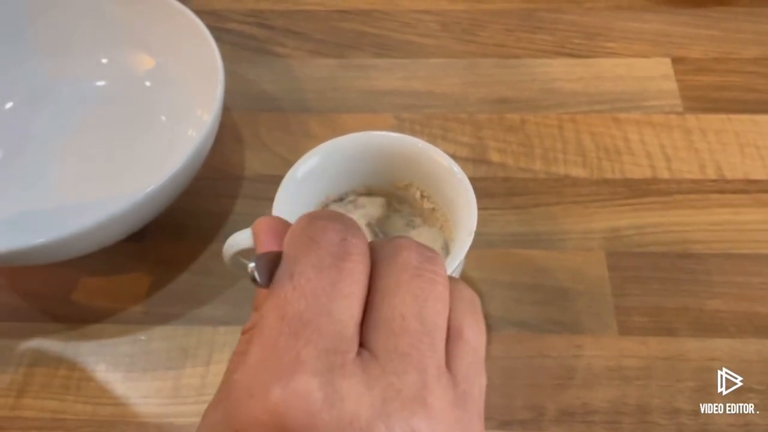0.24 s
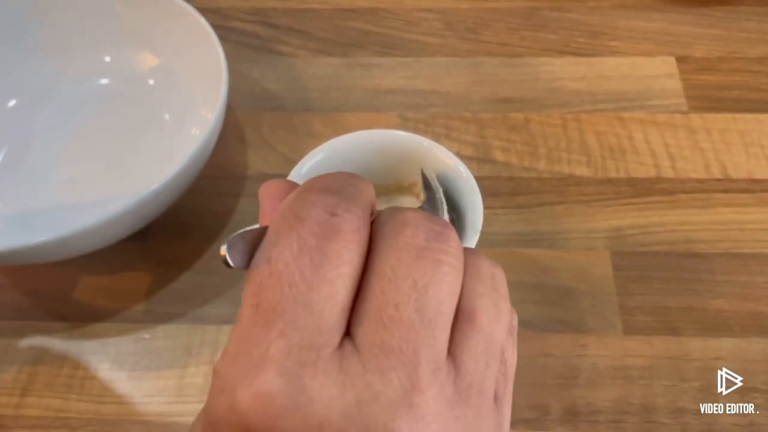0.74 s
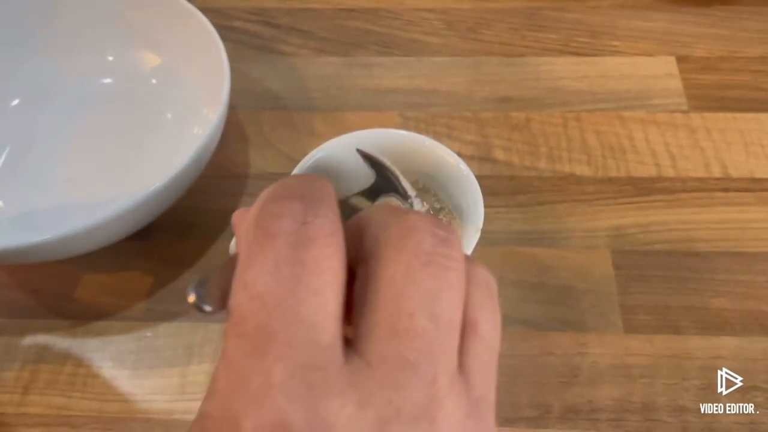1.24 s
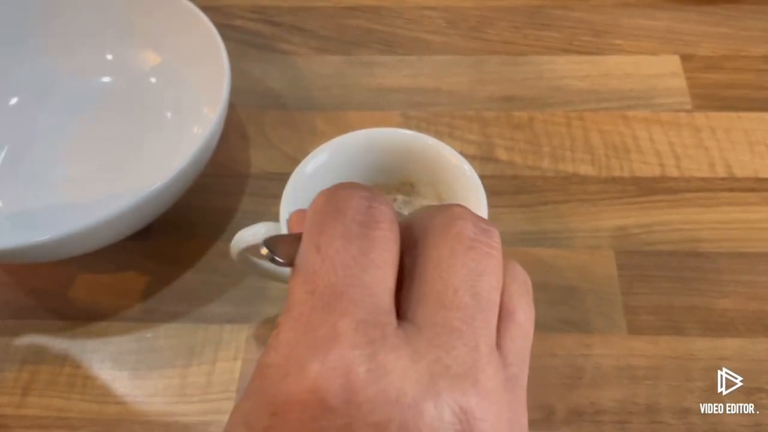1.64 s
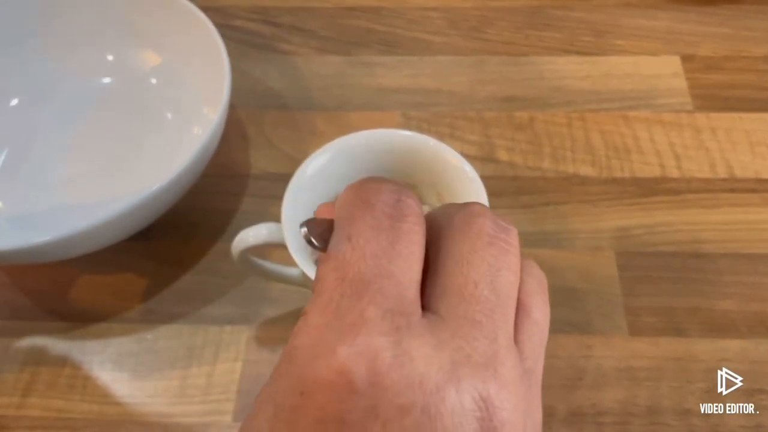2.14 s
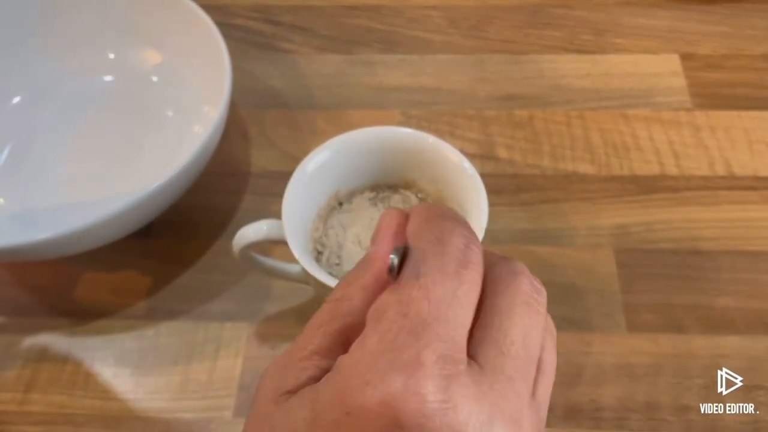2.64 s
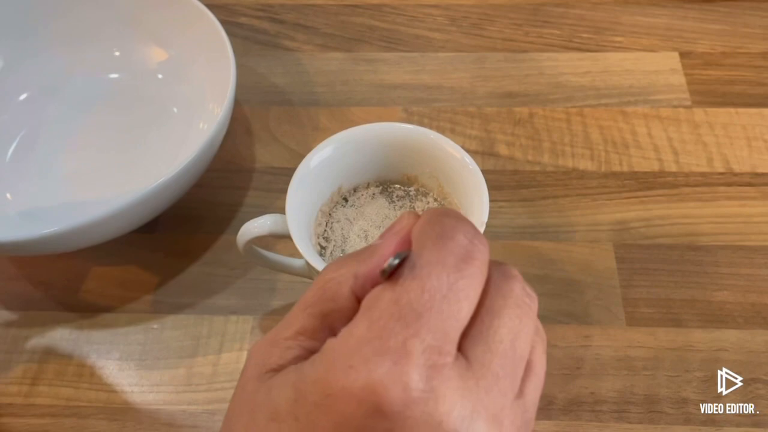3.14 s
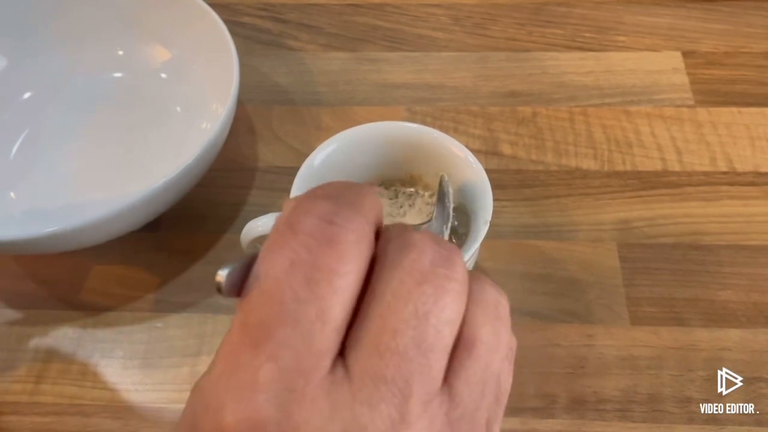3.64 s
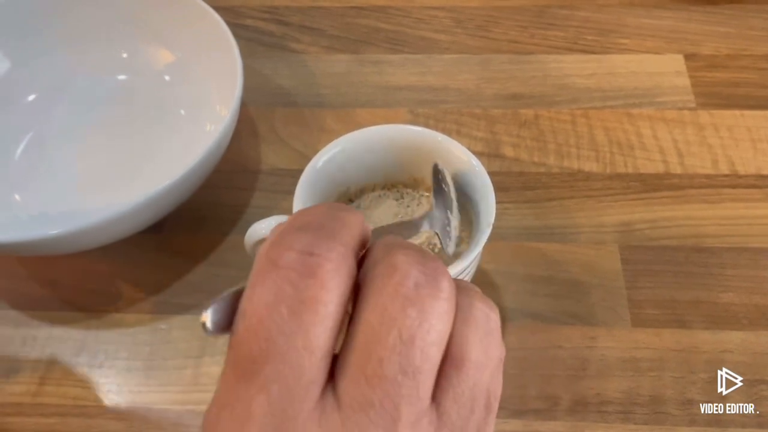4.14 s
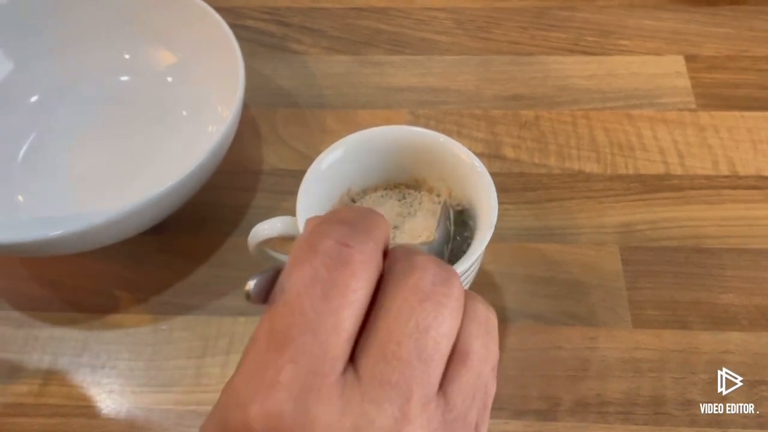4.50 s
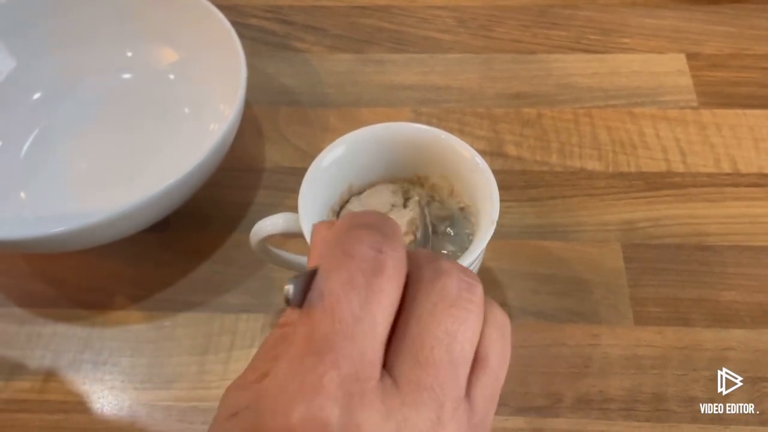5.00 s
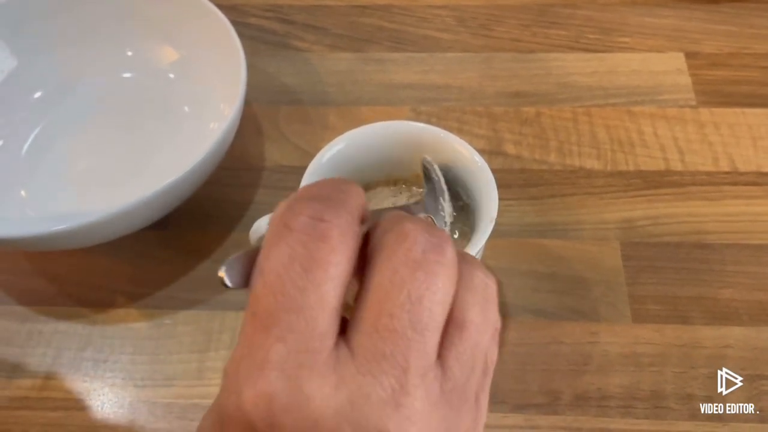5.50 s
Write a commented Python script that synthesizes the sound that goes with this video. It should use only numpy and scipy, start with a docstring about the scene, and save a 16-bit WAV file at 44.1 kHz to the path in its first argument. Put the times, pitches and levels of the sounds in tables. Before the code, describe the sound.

Close above a wooden worktop, a metal spoon taps and rubs the wall of a small filled mug. Hum alone comes first, then irregular clinks with short, damped ceramic ringing, low wooden thuds and small dull bubbles. One heavy rattling blow stands out near two seconds; a busy cluster follows until just after three, then scattered quieter touches. Small live kitchen, faint hiss, stereo phone pickup.

```python
"""An appliance hums in a small kitchen; then a steel teaspoon stirs a thick drink in a small ceramic mug.
The spoon rubs (tiny slips) and clinks (noise bursts and ringing tones) against the wall of the mug.
Blows jolt the mug on the wooden worktop (low dying tones) and the drink sloshes (many small bubbles).
A phone with two microphone ports listens from just above, with quick echoes and the room around it."""
import sys
import numpy as np
from scipy import signal
from scipy.fft import rfft, irfft
from scipy.io import wavfile

SR = 44100
rng = np.random.default_rng(int(sys.argv[2]) if len(sys.argv) > 2 else 0)


def unload_audio(sound):
    """Save the sound as a 16-bit wav file, at the path given as the first command line argument."""
    columns = np.transpose(np.atleast_2d(sound))
    # keep every value between -1 and 1, then stretch to whole-number steps
    steps = np.round(np.clip(columns, -1, 1) * 32767)
    wavfile.write(sys.argv[1], SR, steps.astype(np.int16))


N = 254016
TIME = np.arange(N) / SR
# seconds since the start of one short sound, up to half a second
AGE = TIME[:SR // 2]


def from_db(db):
    """Turn decibels into a plain factor."""
    return 10 ** (np.asarray(db) / 20)


def rms_one(x):
    """Scale a sound to an average strength (rms) of 1."""
    return x / np.sqrt(np.mean(x ** 2) + 1e-20)


def onset_one(x):
    """Scale a blow to rms 1 over its first 12 ms."""
    onset = x[:round(.012 * SR)]
    return x / np.sqrt(np.mean(onset ** 2) + 1e-20)


def at_hz(points, hz, axis=1):
    """Read one column of a table between its rows, on a log-frequency axis."""
    rows = np.array(points)
    return np.interp(np.log(np.maximum(hz, 1)), np.log(rows[:, 0]), rows[:, axis])


def dying(t60):
    """Fade by 60 dB in t60 seconds."""
    return from_db(-60 * AGE / t60)


def mode(hz, t60):
    """A struck resonance: a dying tone that starts upwards or downwards at random."""
    tone = np.sin(2 * np.pi * hz * AGE) * dying(t60)
    return rng.choice([-1, 1]) * onset_one(tone)


def resonate(x, hz, width_hz):
    """Ring a resonance with x, at rms 1; its centre may move from sample to sample."""
    turn = np.exp(2j * np.pi * np.cumsum(hz * np.ones(len(x))) / SR)
    memory = np.exp(-np.pi * width_hz / SR)
    # shift the centre down to 0 Hz, smooth there, and shift back up
    smoothed = signal.lfilter([1], [1, -memory], x / turn)
    return rms_one(np.real(turn * smoothed))


def band(x, low_hz, high_hz, order=2):
    """Keep only the pitches between two limits."""
    sos = signal.butter(order, [low_hz, min(high_hz, SR / 2 - 1)], "band", fs=SR, output="sos")
    return signal.sosfilt(sos, x)


def coloured(x, spectrum):
    """Give white noise of rms 1 a spectrum in dB per Hz."""
    hz = np.fft.rfftfreq(x.shape[-1], 1 / SR)
    gain = from_db(at_hz(spectrum, hz)) * np.sqrt(SR / 2)
    return irfft(rfft(x) * gain, x.shape[-1])


def add(out, s, x):
    """Mix x into out from time s on."""
    i = max(round(s * SR), 0)
    out[i:i + len(x)] += x[:max(N - i, 0)]


HUM_HZ, HUM_DB = 99.85, -48.5
# the appliance's rumble in the room: (frequency [Hz], level [dB per Hz])
ROOM_RUMBLE = [(20, -116), (32, -90), (50, -71.5), (75, -79), (95, -67.5), (116, -73), (135, -79.5),
               (150, -77.5), (240, -83.5), (275, -75.5), (300, -79.5), (322, -77.5), (365, -87),
               (700, -103), (1000, -110)]
# quiet air and microphone hiss: (frequency [Hz], level [dB per Hz])
QUIET_HISS = [(300, -117), (1700, -119), (2500, -123), (6000, -130), (10000, -133), (12500, -134),
              (14000, -143), (16000, -150)]
# a faint high whine: (frequency [Hz], width [Hz], level [dB])
HIGH_WHINE = [(8100, 80, -98), (8720, 150, -86.5), (9140, 160, -88.5)]


def background(rumble_side_db=-17, hiss_side_db=-1.0):
    """A steady tone hums over low noise, with faint hiss and a thin whine made of narrow noise bands."""
    hum = from_db(HUM_DB) * np.sqrt(2) * np.sin(2 * np.pi * HUM_HZ * TIME)
    below_1000_hz = signal.butter(4, 1000, fs=SR, output="sos")
    rumble = signal.sosfilt(below_1000_hz, coloured(rng.standard_normal((2, N)), ROOM_RUMBLE))
    hiss = coloured(rng.standard_normal((2, N)), QUIET_HISS)
    whine = np.zeros(N)
    for hz, width, db in HIGH_WHINE:
        noise = band(rng.standard_normal(N), hz - width / 2, hz + width / 2)
        whine += from_db(db) * rms_one(noise)
    # one noise is common to both ports, a second has opposite signs in them
    common = hum + rumble[0] + hiss[0]
    side = from_db(rumble_side_db) * rumble[1] + from_db(hiss_side_db) * hiss[1]
    return common + np.array([[1], [-1]]) * side + ports(whine)


def bubble(hz, cycles=26, rise=0.99):
    """A pocket of air rings briefly, rising in pitch as it nears the surface."""
    tone = np.sin(2 * np.pi * hz * AGE * (1 + rise * AGE))
    return tone * dying(cycles / hz) * (1 - np.exp(-AGE * hz))


# spoon sweeps through the liquid: (time at its fastest [s], level [dB])
SPOON_SWEEPS = [(0.86, -61.5), (1.4, -78), (2.059, -57), (2.789, -59.5), (3.02, -60.5), (3.68, -77),
                (4.32, -69.5), (4.88, -65.5), (5.48, -70)]
# SWIRL_DB is the steady flow beneath the sweeps
SWEEP_RISE_S, SWEEP_FALL_S, SWIRL_DB = .1, .11, -77
# air pockets close in the drink, with a dull gulp of the drink at 1.69 s:
# (time [s], level [dB], pitch [Hz])
AIR_GULPS = [(0.835, -49, 760), (0.94, -51, 750), (1.693, -54.5, 637), (1.988, -45, 800), (2.056, -62, 706),
             (2.655, -45, 560), (2.692, -47.5, 617), (4.794, -46, 881), (4.842, -50, 850)]


def liquid(low_hz=340, high_hz=950, slosh_db=3.0, gulp_db=-1.5, count=1300):
    """Many small dull bubbles swell and settle with each sweep of thick drink, with a few larger gulps."""
    churn, gulps = np.zeros(N), np.zeros(N)
    for when, size, strength in rng.random((count, 3)):
        hz = low_hz * (high_hz / low_hz) ** size
        # higher bubbles are weaker: the thick drink muffles them
        add(churn, when * N / SR, strength * low_hz / hz * bubble(hz))
    for s, db, hz in AIR_GULPS:
        add(gulps, s, from_db(db + gulp_db) * bubble(hz))
    flow = np.full(N, from_db(SWIRL_DB))
    for s, db in SPOON_SWEEPS:
        slope_s = np.where(TIME < s, SWEEP_RISE_S, SWEEP_FALL_S)
        flow += from_db(db) * np.exp(-((TIME - s) / slope_s) ** 2)
    return from_db(slosh_db) * flow * rms_one(churn) + gulps


# spoon slides along the wall: (start [s], length [s], level [dB], squeal pitch at start [Hz])
WALL_RUBS = [(0.713, 0.075, -62.5, 2240), (0.796, 0.063, -58.5, 3130), (1.004, .03, -81, 3260),
             (1.319, .18, -66.5, 3870), (1.894, 0.13, -65, 3750), (4.16, 0.17, -75.5, 3900),
             (4.27, .03, -72, 4640), (4.735, 0.01, -50.5, 2500), (4.888, 0.043, -68.5, 2164),
             (5.147, 0.08, -78, 3170), (5.359, 0.08, -71.5, 3800), (5.433, 0.12, -68, 3300)]
# resonances that rubbing wakes: (frequency [Hz], width [Hz], level [dB])
RUB_RESONANCES = [(1228, 700, 1), (1750, 350, 2), (2640, 200, -7), (3500, 180, -2), (4630, 380, -2.5),
                  (6300, 430, -7.5), (6670, 200, -10.5), (7000, 130, -2), (8140, 260, 0), (9780, 330, 1.5),
                  (11040, 350, -1.5), (13270, 500, -1.5)]
SQUEAL_DB, SQUEAL_WIDTH_HZ, SQUEAL_SAG_OCTAVES_PER_S = -7.5, 140, 1.976


def rubs(slips_per_s=850, grit_db=-7.0, scatter_db=6.0):
    """Tiny slips over the glaze wake spoon and wall, and a squeal that sinks as the contact moves."""
    out = np.zeros(N)
    for start, length, db, first_hz in WALL_RUBS:
        n = max(round(length * SR), SR // 100)
        slips = rng.random(n) < slips_per_s / SR
        grit = np.zeros(n)
        for hz, width, mode_db in RUB_RESONANCES:
            gain = from_db(mode_db + scatter_db * rng.standard_normal())
            grit += gain * resonate(slips * rng.standard_normal(n), hz, width)
        squeal_hz = first_hz * 2 ** (-SQUEAL_SAG_OCTAVES_PER_S * TIME[:n])
        squeal = resonate(slips * rng.standard_normal(n), squeal_hz, SQUEAL_WIDTH_HZ)
        rub = from_db(grit_db) * rms_one(grit) + from_db(SQUEAL_DB) * squeal
        # fade in and out
        add(out, start, from_db(db) * rub * signal.windows.tukey(n, .5))
    return out


# how every clack shares its strength among the bands: (frequency [Hz], level [dB])
CLACK_SHARES = [(735, -4), (1730, -2.5), (3540, -3), (6900, 0), (12100, -2.5)]
PIVOT_HZ = 3000


def clack_level(db, brightness, hz):
    """A sharp touch tilts the clack towards the treble, a blunt push towards the bass."""
    return db + at_hz(CLACK_SHARES, hz) + brightness * np.log2(hz / PIVOT_HZ)


# spoon meets mug, except the row at 1.69 s, which is part of a dull gulp of the drink:
# (time [s], clack level [dB], brightness [dB per octave], contact pitch [Hz],
# contact level [dB], free ring [dB]); the free ring is low when the spoon stays pressed on
CLINK_EVENTS = [(0.7625, -46.5, 3.1, 4130, -48.5, 2.5), (0.8788, -50, -1.3, 3210, -41.5, 4.5),
                (1.229, -51.5, 0.9, 10900, -48, -2.5), (1.3804, -72, -1, 3824, -62.5, 8.5),
                (1.6925, -78.5, -4, 640, -53.5, -9), (1.7633, -59, 0, 10900, -55, 0),
                (1.7754, -57.5, 5, 3230, -51, 3), (1.8201, -56, 1.5, 4000, -56, 0.5),
                (1.8728, -64.5, 1, 4770, -60, -8), (1.8773, -55, 2.5, 4530, -64, -1),
                (1.885, -51.5, 3.5, 4910, -47.5, -3), (2.088, -35.5, -4, 3540, -31, -14.5),
                (2.1019, -54, -8, 5050, -47, -5), (2.128, -64, -5.5, 5300, -60, -8),
                (2.4303, -56.5, 4, 1673, -50.5, -7.5), (2.4744, -43.5, -1.9, 4500, -48, 0.5),
                (2.5809, -72.5, -5.5, 1120, -67, 4), (2.7006, -57.5, -3, 2245, -48, -6),
                (2.7571, -41, -1.6, 2016, -33.5, -8.5), (2.8053, -49, 0, 3330, -40, -16),
                (2.886, -52, -3, 1762, -43, 1), (2.8899, -53, -3.5, 1144, -46, -0.5),
                (2.9633, -68.5, -2, 2240, -62.5, -1.5), (3.0409, -48, -2, 2010, -39, -9.5),
                (3.0703, -52.5, -2.7, 3410, -56.5, 5.5), (3.132, -36.5, -1.5, 1890, -29.5, -13),
                (3.2056, -71.5, 6.5, 1530, -55.5, 3), (3.28, -64, -0.3, 3620, -55.5, -0.5),
                (3.3871, -67.5, -4.5, 3144, -69, 11), (3.6193, -49.5, 0, 3296, -57.5, 4.5),
                (4.0547, -42.5, -1.5, 1810, -47.5, -3), (4.1047, -55, 1.3, 7340, -56.5, 0),
                (4.3526, -62, -4, 3320, -58.5, 2), (4.74, -52.5, -0.7, 4175, -52, 1),
                (4.880, -63, 0, 2260, -52.5, -15.5), (5.262, -54, 0, 3815, -54.5, -3)]
# borders between the bands of a clack: (frequency [Hz])
BAND_BORDERS = [450, 1200, 2500, 5000, 9500, 15500]
# broad humps and dips that spoon and filled mug give every clack: (frequency [Hz], level [dB])
BODY_TONE = [(700, -4.5), (950, -2), (1900, 3.5), (2400, -4), (3100, 6.5), (3800, 6), (4450, 7.5),
             (5400, -17), (6500, -3), (7300, 0), (8100, 4.5), (8800, 1), (11000, -7), (12200, -8.5),
             (13500, -5)]
# wall modes of the mug: (frequency [Hz], level relative to the clack around that pitch [dB], t60 [s])
MUG_MODES = [(928, -11.5, 0.18), (1650, -15.5, 0.043), (1790, -21.5, 0.19), (2865, -3.5, 0.075),
             (3150, -9.5, 0.17), (3410, -6.5, 0.12), (4350, -24.5, .11), (4450, -15, 0.1146),
             (5220, -16.5, 0.074), (6080, -11, 0.06), (6340, -14, 0.075), (7340, -5.5, 0.032),
             (8360, -15.5, 0.043), (9390, -2, 0.013), (10300, -29.5, 0.12), (11080, -8.5, 0.044),
             (13400, -20, 0.084)]
# the contact tone's t60 is for a free ring of 0 dB; a freer spoon rings longer
CONTACT_T60_S, CONTACT_WIDTH_OCTAVES = 0.063, 0.45


def clinks(clack_t60=0.025, crack_t60=0.0022, crack_db=-2.5, clack_db=-5.5, contact_db=-6.0,
           pitch_db=-6.5, pitch_follows=0.42, decay_follows=0.706, ring_db=-8.5,
           scatter_db=4.0, detune=0.009, bite_s=0.00011):
    """Each event: a crack, a clack of dense damped noise, a tone at the contact pitch, the wall's ring."""
    out, edges = np.zeros(N), np.array(BAND_BORDERS)
    # the force builds up as the steel bites into the wet glaze
    bite = 1 - np.exp(-AGE / bite_s)
    shape = (dying(clack_t60) + from_db(crack_db) * dying(crack_t60)) * bite
    spread = 2 ** (CONTACT_WIDTH_OCTAVES / 2)
    for s, db, brightness, hz, level_db, free_db in CLINK_EVENTS:
        clack = coloured(rng.standard_normal(len(AGE)), BODY_TONE) * shape + 1e-18
        for k, (low, high) in enumerate(zip(edges, edges[1:])):
            band_db = clack_level(db, brightness, np.sqrt(low * high))
            part = onset_one(band(clack, low, high, order=3))
            # neighbouring bands take opposite signs
            add(out, s, (-1) ** k * from_db(band_db + clack_db) * part)
        # a pressed spoon gives a broad knock around the contact pitch, a rebounding one a clear tone
        knock = band(rng.standard_normal(len(AGE)) * shape + 1e-18, hz / spread, hz * spread)
        add(out, s, from_db(level_db + contact_db) * onset_one(knock))
        tone = mode(hz, CONTACT_T60_S * from_db(decay_follows * free_db))
        add(out, s, from_db(level_db + pitch_db + pitch_follows * free_db) * tone)
        for mode_hz, mode_db, mode_t60 in MUG_MODES:
            # the place of the blow decides how strongly each wall mode takes it up: drawn at random
            drive_db = clack_level(db, brightness, mode_hz) + scatter_db * rng.standard_normal()
            # the load of spoon and swirling liquid shifts its pitch a little, also at random
            loaded_hz = mode_hz * (1 + detune * rng.standard_normal())
            ring = mode(loaded_hz, mode_t60)
            add(out, s, from_db(drive_db + mode_db + free_db + ring_db) * ring)
    return out


# mug jolts on the worktop: (time [s], level [dB], frequency around which it thumps [Hz])
MUG_JOLTS = [(0.765, -42, 268), (0.880, -43.5, 165), (1.229, -52.5, 585), (1.765, -53, 613),
             (2.09, -31.5, 670), (2.0919, -23, 270), (2.476, -39.5, 170), (2.759, -33.5, 150),
             (2.888, -38.5, 140), (3.043, -44.5, 300), (3.134, -30, 200), (3.62, -50, 329),
             (4.057, -38.5, 345), (4.355, -44, 329), (4.742, -42.5, 179)]
# modes of mug and worktop together: (frequency [Hz], level [dB], t60 [s])
WORKTOP_MODES = [(133.4, -1.5, .25), (161.5, -2, 0.1), (232.2, -4, 0.058), (275, -2, 0.11),
                 (320.5, -3, 0.089), (339.6, 1, .07), (455, -10.5, 0.094), (570, -18, 0.08),
                 (666, -10, 0.088), (801, -8, .1)]


def jolts(rise_s=0.0013, thud_db=-3.5, fall_db_per_octave=12.0):
    """The mug's foot thumps on the wood, modes in step; each jolt favours the modes around its own pitch."""
    out = np.zeros(N)
    for s, db, centre_hz in MUG_JOLTS:
        thud = np.zeros(len(AGE))
        for hz, mode_db, t60 in WORKTOP_MODES:
            # modes far from the centre of the thump are weaker
            gain = from_db(mode_db - fall_db_per_octave * abs(np.log2(hz / centre_hz)))
            thud += gain * np.sin(2 * np.pi * hz * AGE) * dying(t60)
        thud = thud * (1 - np.exp(-AGE / rise_s))
        add(out, s, from_db(db + thud_db) * onset_one(thud))
    return out


# the hardest blow sets spoon and mug chattering: (start [s], level [dB], t60 [s])
CHATTER_BURST = (2.091, -37.5, 0.15)
# broad resonances of that chatter: (frequency [Hz], width [Hz], level [dB])
CHATTER_RESONANCES = [(626, 30, 7), (942, 77, -8.5), (1205, 161, -10), (1530, 240, -2), (2400, 900, -11),
                      (3350, 350, 3.5), (4530, 330, -8.5), (4900, 260, 6), (5830, 280, -4.5),
                      (5930, 400, 2), (7706, 660, -19.5), (12820, 1350, -30)]


def chatter(touches_per_s=2500):
    """A dying train of tiny bounces keeps the resonances rough."""
    start, db, t60 = CHATTER_BURST
    touches = (rng.random(len(AGE)) < touches_per_s / SR) * dying(t60)
    rattle = np.zeros(len(AGE))
    for hz, width, mode_db in CHATTER_RESONANCES:
        bounces = touches * rng.standard_normal(len(AGE))
        rattle += from_db(mode_db) * resonate(bounces, hz, width)
    out = np.zeros(N)
    add(out, start, from_db(db) * onset_one(rattle))
    return out


def near_echoes(x, level_db=-1.5):
    """Hand, bowl and worktop throw back quick reflections, different ones to each port."""
    taps = rng.standard_normal((2, len(AGE))) * dying(.045) * (1 - np.exp(-AGE / .001))
    response = band(taps / np.sqrt(np.sum(taps ** 2) / 2), 800, 6300, order=3)
    return from_db(level_db) * signal.fftconvolve(x[None], response, axes=1)[:, :N]


# kitchen reverberation: (frequency [Hz], t60 [s], level [dB], share that differs between the ports [0 to 1])
KITCHEN_ECHO = [(100, .4, -6.5, .03), (400, 0.35, -2.5, 0.87), (1490, 0.27, -7.5, 0.547),
                (4370, 0.29, -9.5, 0.47), (8380, 0.23, -15, 0.034), (15000, 0.16, -15.5, .08)]


def kitchen(x, first_echo_s=.01):
    """Diffuse reflections, made of noise, die away band by band."""
    response, edges = 0, [70, 200, 500, 1100, 2400, 4200, 7200, 11000, 17000]
    for low, high in zip(edges, edges[1:]):
        hz = np.sqrt(low * high)
        fade = dying(at_hz(KITCHEN_ECHO, hz)) * (AGE > first_echo_s)
        tail = rng.standard_normal((2, len(AGE))) * fade
        mid, side = band(tail / np.sqrt(np.sum(tail ** 2) / 2), low, high, order=3)
        apart = np.clip(at_hz(KITCHEN_ECHO, hz, axis=3), 0, 1)
        stereo = np.sqrt(1 - apart) * mid + np.sqrt(apart) * side * [[1], [-1]]
        response = response + from_db(at_hz(KITCHEN_ECHO, hz, axis=2)) * stereo
    return signal.fftconvolve(x[None], response, axes=1)[:, :N]


# how far the left port leads the right: (frequency [Hz], phase [radians])
PORT_LEAD = [(0, 0), (1800, .05), (3000, .4), (5000, .5), (6700, -.7), (7800, -2.9), (8700, -3.4),
             (9600, -4.3), (10700, -6.1), (12200, -6.4), (13200, -7.6), (13900, -9.3), (16000, -9.4)]
# near sound: (frequency [Hz], left minus right level [dB])
PORT_LEAN = [(100, 0), (250, 2), (550, -.5), (1100, 3), (2200, 6), (4200, 4.5), (7000, 1), (9000, 0)]


def ports(near, diffuse=0):
    """Near sound differs in level at the two ports; near and diffuse sound both reach them out of phase."""
    hz = np.fft.rfftfreq(N, 1 / SR)
    # each port takes half of the difference
    lean = from_db(at_hz(PORT_LEAN, hz) / 2 * np.array([[1], [-1]]))
    lag = np.exp(-1j * np.interp(hz, *np.transpose(PORT_LEAD)) * np.array([[-.5], [.5]]))
    both = rfft(near) * lean + rfft(diffuse + np.zeros((2, N)))
    return irfft(both * lag, N)


def scene(mug_db=-0.78):
    """The background, and the mug close by with its reflections."""
    mug = from_db(mug_db) * (liquid() + rubs() + clinks() + jolts() + chatter())
    return background() + ports(mug, near_echoes(mug) + kitchen(mug))


CUTOFF_HZ = 16000


def record(dry):
    """The microphone's top rolls off gently and is then cut steeply."""
    soft = signal.sosfilt(signal.butter(1, 15500, fs=SR, output="sos"), dry)
    return signal.sosfilt(signal.ellip(10, .1, 80, CUTOFF_HZ, fs=SR, output="sos"), soft)


dry = scene()
out = record(dry)
unload_audio(out)
```